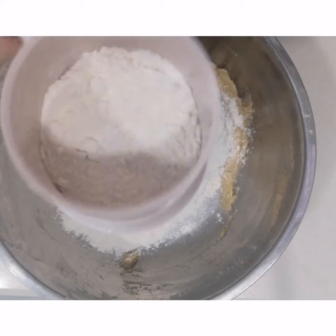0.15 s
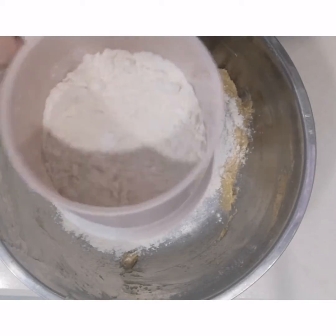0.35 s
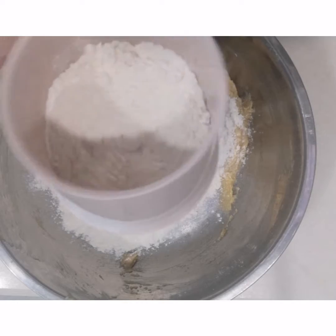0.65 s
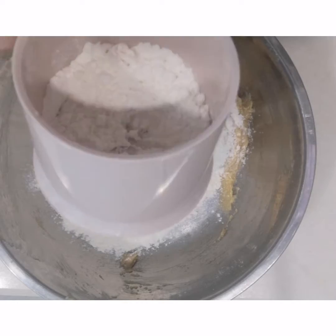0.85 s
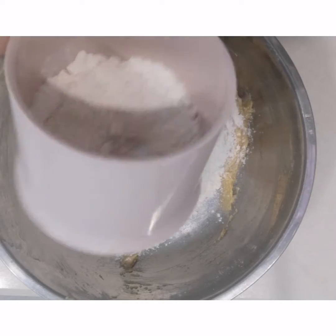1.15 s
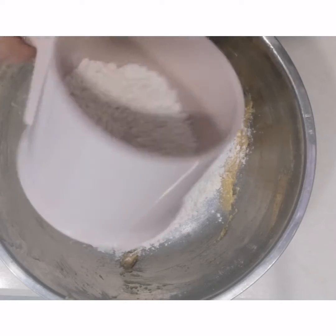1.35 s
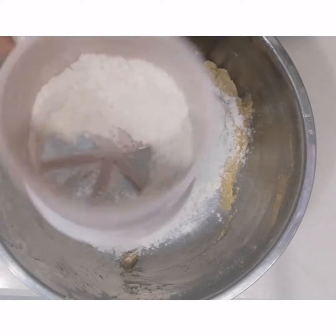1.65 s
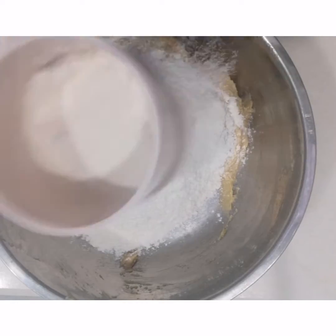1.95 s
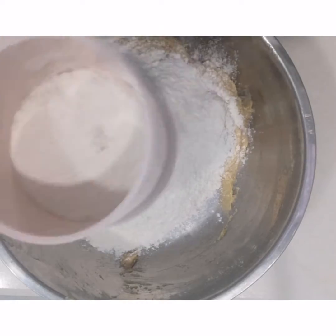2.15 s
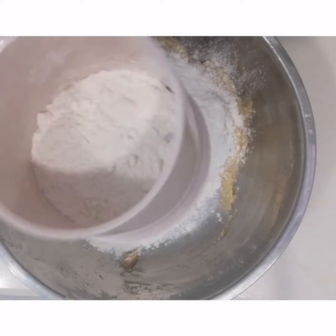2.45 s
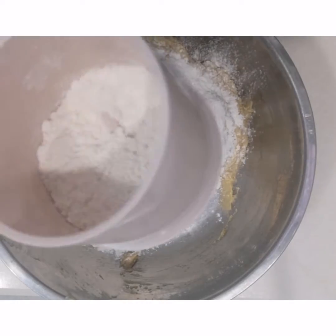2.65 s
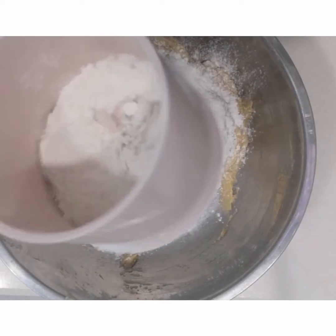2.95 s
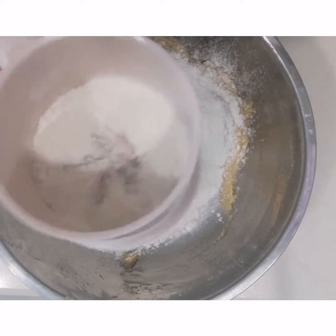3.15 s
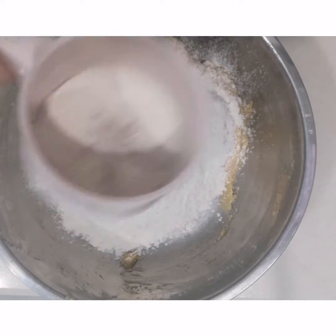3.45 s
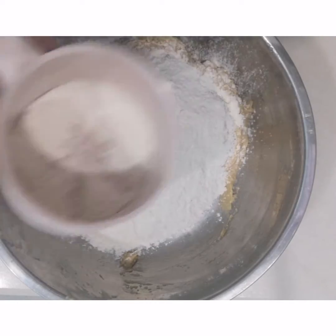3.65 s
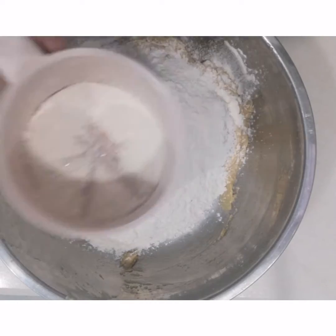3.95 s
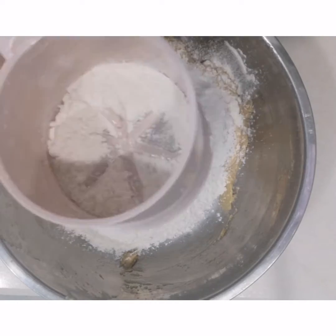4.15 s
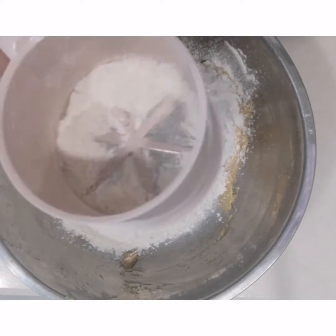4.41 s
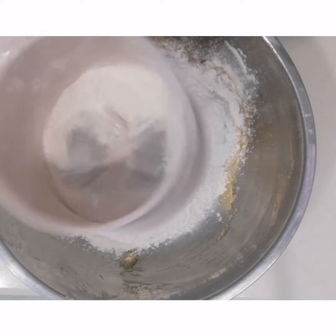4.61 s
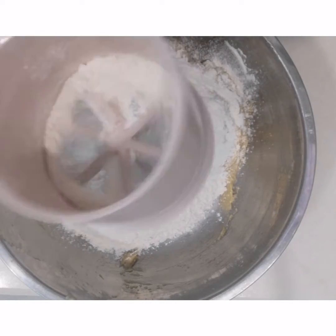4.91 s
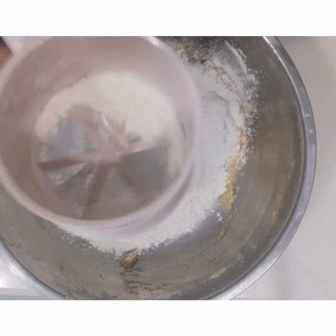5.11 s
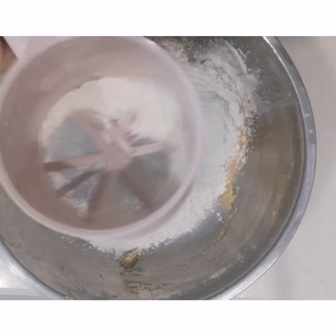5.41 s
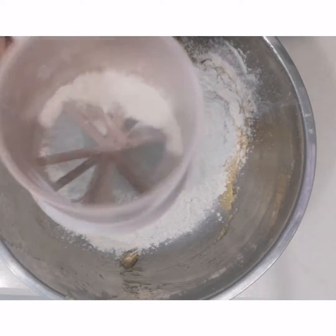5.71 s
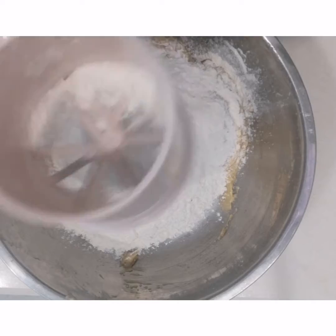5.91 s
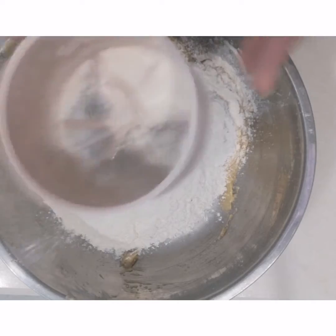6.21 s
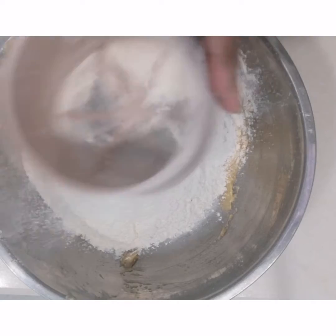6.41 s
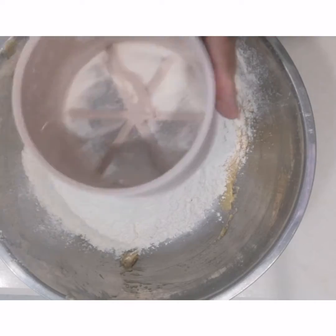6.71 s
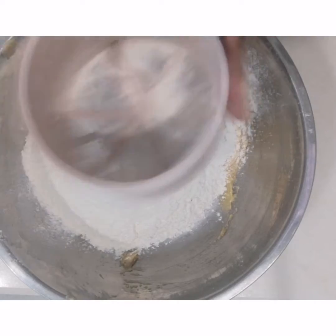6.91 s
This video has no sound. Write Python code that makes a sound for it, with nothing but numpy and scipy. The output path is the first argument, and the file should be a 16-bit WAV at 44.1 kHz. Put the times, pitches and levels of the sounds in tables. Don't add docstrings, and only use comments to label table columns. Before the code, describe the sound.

A plastic squeeze-handle flour sifter clacks in three brisk bursts, each squeeze a gritty mesh scrape ending in a sharp slap, over a low appliance hum.

```python
import sys
import numpy as np
from scipy import signal
from scipy.fft import rfft, irfft, next_fast_len
from scipy.io import wavfile
from scipy.ndimage import uniform_filter1d, map_coordinates

SR = 44100
rng = np.random.default_rng(int(sys.argv[2]) if len(sys.argv) > 2 else 0)


def makeup_ratio(level_db):
    decades = np.asarray(level_db, float) / 20
    return 10 ** decades


def bounce(signal):
    frames = np.transpose(np.atleast_2d(signal))
    limited = np.clip(frames, -1, 1)
    pcm = np.round(limited * 32767).astype(np.int16)
    wavfile.write(sys.argv[1], SR, pcm)


N = 311787
RIGHT_LATE = 26
FIRM_DB = -34


def unit(x):
    return x / np.sqrt(np.mean(x ** 2) + 1e-20)


def along(points, hz):
    f, v = np.transpose(points)
    return np.interp(np.log(hz + 1), np.log(f + 1), v)


def curves(rows):
    s, *cols = np.transpose(rows)
    return [np.interp(np.arange(N) / SR, s, c) for c in cols]


def wobble(rate):
    knots = rng.standard_normal(int(N * rate / SR) + 4)
    return map_coordinates(knots, [np.arange(N) * rate / SR])


def unit_gain(h):
    return h / np.sqrt(np.mean(abs(h) ** 2, axis=-1, keepdims=True))


def filtered(x, response):
    m = next_fast_len(N + SR // 2)
    h = unit_gain(response(np.fft.rfftfreq(m, 1 / SR)))
    return irfft(rfft(x, m) * h, m)[..., :N]


def modes(table, spread_db):
    share = makeup_ratio(spread_db * rng.standard_normal((len(table), 2, 1)))

    def response(f):
        total = 0
        for k, (c, w, db) in enumerate(table):
            ring = 1j * f * w / (c * c - f * f + 1j * f * w)
            total = total + (-1) ** k * share[k] * makeup_ratio(db) * ring
        return total
    return response


def grit(alike, spiky_db):
    size = makeup_ratio(spiky_db * rng.standard_normal((3, N)))
    shared, *own = rng.standard_normal((3, N)) * size
    common = np.array([shared, np.roll(shared, RIGHT_LATE)])
    pair = alike * common + np.sqrt(1 - alike ** 2) * np.array(own)
    return unit(pair * makeup_ratio(2.04 * wobble(300)))


def add(track, s, db, rise, fall):
    steps = np.arange(-SR // 20, SR // 6)
    t = steps / SR
    at = round(s * SR) + steps
    swell, fade = np.exp(np.minimum(t, 0) / rise), np.exp(-np.maximum(t, 0) / fall)
    shape = np.where(t < 0, swell, fade)
    keep = (at >= 0) & (at < N)
    track[at[keep]] += (makeup_ratio(db) * shape[keep]) ** 2


def knocks(times, db, rebound_db):
    force = np.zeros((2, N + SR))
    for s, peak_db, draw in zip(times, db, rng.random((len(times), 3, 5))):
        late = np.append(0, .0005 + .0045 * draw[0])
        rebounds = np.sign(draw[1] - .5) * makeup_ratio(rebound_db - 540 * late[1:])
        size = makeup_ratio(peak_db) * np.append(1, rebounds)
        at = np.round((s + late) * SR).astype(int)
        np.add.at(force[0], at, size)
        np.add.at(force[1], at + RIGHT_LATE, size * np.append(1, 3 * draw[2] - 1))
    return force[:, :N]


# time in seconds, hum level in dB.
HUM_LOAD = [(0, -48), (.3, -41), (.7, -39), (1.5, -39), (2.2, -45), (2.7, -37), (3.4, -38), (3.7, -43),
            (4.15, -35), (4.6, -39), (5.3, -40), (5.8, -37), (6.4, -42), (7.07, -41)]
# pitch in Hz, level in dB per Hz.
RUMBLE_COLOUR = [(20, -32), (30, -8), (40, -24), (58, -23), (91, -29.5), (137, -24), (172, -36.5),
                 (235, -31.5), (295, -45), (322, -38), (500, -60.5), (650, -80.5), (1100, -120)]


def appliance():
    shaft_hz, fan_shaft_hz, beat_peak_s = 25.91, 22.25, 3.45
    t = np.arange(N) / SR
    drift = .2 * np.array([wobble(2), wobble(3)])
    one, two = 2 * np.pi * np.outer([shaft_hz, fan_shaft_hz], t - beat_peak_s) + drift
    mixed = makeup_ratio(-14 + 2 * wobble(1.5)) * np.sin(two)
    mixed = mixed + makeup_ratio(-19) * np.sin(2 * one - two) + makeup_ratio(-20) * np.sin(one + two)
    load_db = uniform_filter1d(curves(HUM_LOAD)[0], size=SR // 10)
    hum = makeup_ratio(load_db + 3) * (np.sin(one) + mixed)
    fan = makeup_ratio(-65.5 + wobble(2.9)) * np.sin(2 * np.pi * 136 * t + .56 * wobble(2.1))
    mid, side = filtered(rng.standard_normal((2, N)), lambda f: makeup_ratio(along(RUMBLE_COLOUR, f)))
    side = unit(filtered(side, lambda f: f ** 2))
    handled = np.clip(sum(np.exp(-((t - s) / .3) ** 2) for s, *_ in SLAMS), 0, 1)
    handled = handled * (1 - .5 * curves(EMPTIED)[0])
    rumble = makeup_ratio(-58.5 + 8 * handled + 2.4 * wobble(8.9))
    return hum + fan + rumble * (mid + makeup_ratio(-12.5) * side * [[1], [-1]])


# pitch in Hz, level in dB per Hz.
AIR_COLOUR = [(250, -28), (450, -5.5), (650, -10), (950, -5.5), (1400, -8), (1950, -4.5), (2500, -9.5),
              (4100, -17), (6500, -21), (9500, -20), (10500, -26), (13000, -29), (15500, -29.5),
              (16000, -62.5)]


def room_air():
    noise = filtered(rng.standard_normal((2, N)), lambda f: makeup_ratio(along(AIR_COLOUR, f)))
    return makeup_ratio(-68 + .6 * wobble(4)) * noise


# time in seconds, level in dB, wall share in dB, swell in seconds, fade in seconds.
STRAY_SCUFFS = [
    (.022, -41, 4, .001, .017),
    (2.873, -43, -15, .001, .004),
    (3.428, -49, 6, .005, .017),
    (4.177, -36, -10, .001, .01),
    (6.071, -23, 5, .003, .03),
    (7.0577, -30.5, -30, .001, .006),
]


def stray_scuffs():
    return [(s, db, wall_db, -11, swell, fade) for s, db, wall_db, swell, fade in STRAY_SCUFFS]


# start in seconds, travel in seconds,
# break-away level in dB, sliding level in dB, level of landing at rest in dB.
SPRING_BACK = [(0.0351, .048, -38, -41, -44.5), (0.3363, .048, -33, -41.5, -44),
               (0.6407, .04, -33, -41, -41), (0.9463, .052, -33, -36.5, -44.5),
               (1.2436, .046, -29, -37.5, -46.5), (1.5573, .04, -30, -38, -38.5),
               (2.715, .047, -36.5, -34, -35.5), (3.0592, .042, -29.5, -39.5, -41.5),
               (4.1846, .046, -33, -38.5, -40), (4.4938, .04, -30.5, -40, -38.5),
               (4.7686, .048, -30, -38, -36.5), (5.048, .049, -29, -45, -36.5),
               (5.3323, .048, -24.5, -33, -45), (5.618, .045, -23, -37, -45),
               (5.89, .054, -24.5, -35.5, -39.5)]


def releases():
    rows = []
    for s, travel, break_db, slide_db, rest_db in SPRING_BACK:
        rows.append((s, break_db, -6, -8, .0055, .018))
        rows.append((s + .48 * travel, slide_db, 0, -13, .007, .017))
        rows.append((s + travel, rest_db, 2, -3, .003, .009))
    return rows


# start in seconds before the slam, starting level in dB, level of catching a rib in dB.
SQUEEZE_STROKES = [(.043, -44, -50), (.048, -47, -38), (.039, -48, -35.5), (.042, -46, -36.5),
                   (.046, -43, -37.5), (.036, -36.5, -35.5), (.036, -39, -40), (.04, -36, -36.5),
                   (.048, -43, -34), (.041, -43, -33), (.046, -47, -29), (.041, -41, -33.5),
                   (.045, -39.5, -31), (.041, -48.5, -28), (.041, -50, -29.5)]


def squeezes():
    rows = []
    for (slam, *_), (lead, start_db, catch_db) in zip(SLAMS, SQUEEZE_STROKES):
        rows.append((slam - lead, start_db, -3, -8, .004, .015))
        rows.append((slam - .025, catch_db, -4, -7, .0055, .015))
    return rows


def scrape(mesh, wall, cup):
    for s, db, wall_db, cup_db, swell, fade in squeezes() + releases() + stray_scuffs():
        wall_luck, cup_luck = 2 * rng.standard_normal(2)
        firmer_db = db - FIRM_DB
        cup_db = cup_db - .55 * firmer_db
        fade = fade * .5 ** (max(firmer_db, 0) / 11)
        add(mesh, s, db + 1, swell, fade)
        add(wall, s, db + wall_db + wall_luck - 4.5, swell, fade)
        add(cup, s, db + cup_db + cup_luck + 4.5, swell, fade * 1.69)


def handle_rests():
    s, travel, _, _, rest_db = np.transpose(SPRING_BACK)
    blows = knocks(s + travel, rest_db + 28, rebound_db=-11)
    thumps = knocks(s + travel, -31 + .3 * (rest_db - FIRM_DB), rebound_db=-11)
    return blows, thumps


# time in seconds, peak level in dB, jolt of the mesh in dB, thump of the base in dB.
SLAMS = [(0.2366, -7.5, -20.5, -29), (0.5285, -8.5, -18.5, -30), (0.8273, -9, -16, -32),
         (1.134, -7.5, -15.5, -30.5), (1.4354, -7.5, -14.5, -33.5), (1.7485, -7.5, -14.5, -32),
         (2.9311, -8.5, -13, -39), (3.248, -9.5, -14, -42), (4.3777, -8, -12.5, -39),
         (4.6704, -6.5, -15.5, -46), (4.9557, -7, -13.5, -39), (5.2271, -6, -12, -47),
         (5.511, -6.5, -12.5, -42.5), (5.7963, -7, -11, -43), (6.0764, -14, -7, -44)]


def handle_slams(mesh, wall):
    run_up_s = .009
    for s, db, jolt_db, _ in SLAMS:
        add(mesh, s, db + jolt_db + 1.5, run_up_s, .003)
        add(wall, s, db - 20, run_up_s * .5, .005)
    s, db, _, thump_db = np.transpose(SLAMS)
    blows = knocks(s - .0004, db + 13, rebound_db=-8)
    thumps = knocks(s, db + thump_db + 20, rebound_db=-11)
    return blows, thumps


# pitch in Hz, level in dB per Hz.
MESH_COLOUR = [(700, -43), (1300, -9.5), (2000, -3.5), (3500, -4), (4100, -5), (5150, -2.5), (6900, -6.5),
               (8100, -3.5), (9600, -6.5), (10400, -15), (12500, -19.5), (15000, -17.5), (15400, -48),
               (16000, -94)]


def mesh_hiss(power):
    hiss = np.sqrt(power) * grit(.3, spiky_db=3)
    return filtered(hiss, lambda f: makeup_ratio(along(MESH_COLOUR, f)) * (f < 15300))


# pitch in Hz, width in Hz, level in dB.
WALL_NOTES = [(1143, 110, 0.5), (1380, 250, -11), (1630, 170, 1.5), (1860, 150, -10), (2170, 220, -1),
              (2573, 260, -3.5), (3040, 260, -2.5), (3350, 450, -7), (3834, 850, -17), (2140, 2480, -9.5)]


def plastic_wall(power, blows):
    blows = uniform_filter1d(blows, size=3, axis=1)
    force = np.sqrt(power) * grit(.59, spiky_db=2.5) + .8 * blows
    grip = np.pi / 4 * (1 + np.tanh(wobble(4)))
    one_grip = filtered(force * np.cos(grip), modes(WALL_NOTES, 2.1))
    other_grip = filtered(force * np.sin(grip), modes(WALL_NOTES, 2.1))
    return one_grip + other_grip


# pitch in Hz, width in Hz, level in dB.
FULL_CUP_NOTES = [(411.5, 70, -16), (560, 300, -18.5), (770, 140, -8), (904.6, 95, -0.5), (995, 96, -1),
                  (1440, 120, -17)]
# pitch in Hz, width in Hz, level in dB.
BARE_CUP_NOTES = [(418, 98, -20.5), (560, 300, -28), (895, 150, -8.5), (1052, 120, 3), (1250, 280, -10.5),
                  (1390, 200, -12)]
# time in seconds, share of the
EMPTIED = [(0, 0.15), (3.5, 0.18), (4.5, 0.45), (5.2, 0.92), (7.07, 0.7)]


def cup_air(power):
    rasp = np.sqrt(power) * grit(.45, spiky_db=3.5)
    gone = curves(EMPTIED)[0]
    full = filtered(rasp * np.sqrt(1 - gone), modes(FULL_CUP_NOTES, 1))
    bare = filtered(rasp * np.sqrt(gone), modes(BARE_CUP_NOTES, 1))
    return full + makeup_ratio(-3) * bare


# pitch in Hz, width in Hz, level in dB.
BASE_NOTES = [(80, 60, -8), (200, 80, -16.5), (284, 70, -0.5), (410, 90, -3.5), (530, 160, -7)]


def base(thumps):
    return filtered(thumps, modes(BASE_NOTES, 1))


# pitch in Hz, time to fall by 60 dB in seconds.
KITCHEN_FADE = [(300, 0.39), (1000, 0.72), (2500, 0.8), (4000, 0.66), (7000, 0.57), (12000, 0.39)]


def kitchen(x, early_db, count):
    last_echo_s, drop_db = .175, -8
    wet = np.zeros((2, N + SR))
    step = N // count + 1
    for at in range(0, N, step):
        hz, t, z = signal.stft(rng.standard_normal((2, SR // 2)), SR, nperseg=256)
        late_db = -60 * t / along(KITCHEN_FADE, hz)[:, None]
        late_db = late_db + drop_db * np.clip((t - last_echo_s) / .06, 0, 1)
        near_walls = makeup_ratio(early_db - 60 * t / .12)
        tail = signal.istft(z * (makeup_ratio(late_db) + near_walls), SR, nperseg=256)[1]
        tail = tail / np.linalg.norm(tail[0])
        answer = signal.fftconvolve(x[:, at:at + step], tail, axes=1)
        wet[:, at + 200:at + 200 + answer.shape[1]] += answer
    return wet[:, :N]


# time in seconds, level in dB.
RUSTLES = [
    [(2.3, -84), (2.536, -77), (2.7, -71)],
    [(3.9, -79), (4.0, -79), (4.165, -75)],
    [(6.3, -70), (6.838, -73.5), (7.045, -78)],
]


def rustle():
    rows = []
    for part in RUSTLES:
        rows += [(part[0][0] - .02, -100), *part, (part[-1][0] + .005, -100)]
    rub = grit(.2, spiky_db=4.5) * makeup_ratio(2.3 * wobble(60))
    rub = filtered(rub, lambda f: makeup_ratio(along(MESH_COLOUR, f)))
    return makeup_ratio(curves(rows)[0] + 2.5) * unit(rub)


# time in seconds, peak level in dB.
CRUMBS = [(2.5182, -54), (6.3967, -57), (6.434, -60), (6.4844, -60), (6.5184, -57), (6.5425, -58),
          (6.5694, -59), (6.5804, -57), (6.653, -55), (6.6618, -54), (6.6784, -49), (6.7314, -55),
          (6.7674, -64), (6.867, -51.5), (7.0254, -59)]


def crumbs(mesh):
    for s, db in CRUMBS:
        add(mesh, s + .0015, db - 5, .0012, .007)


# time in seconds, peak level in dB, brightness in dB.
FINGER_TICKS = [
    (2.591, -33, -36),
    (2.6357, -39, -26),
    (3.5352, -40, 6),
    (4.051, -49, -14),
]
# pitch in Hz, width in Hz, level in dB.
RIM_NOTES = [(1120, 120, -4), (1630, 110, -6), (1830, 250, -14)]


def finger_ticks(mesh):
    rim = np.zeros(N)
    for s, db, bright_db in FINGER_TICKS:
        add(rim, s, db - 9.5, .0008, .006)
        add(mesh, s, db + bright_db - 13, .0005, .004)
    return filtered(np.sqrt(rim) * grit(.99, spiky_db=-1), modes(RIM_NOTES, 1.2))


def sifter():
    mesh, wall, cup = np.zeros((3, N))
    scrape(mesh, wall, cup)
    rest_blows, rest_thumps = handle_rests()
    slam_blows, slam_thumps = handle_slams(mesh, wall)
    crumbs(mesh)
    ticks = finger_ticks(mesh)
    taps = ticks + base(slam_thumps + rest_thumps)
    return mesh_hiss(mesh), plastic_wall(wall, slam_blows + rest_blows), cup_air(cup), taps


def scene():
    hiss, wall, hollow, taps = sifter()
    near = (hiss + wall + hollow + taps) * makeup_ratio([[.6], [-.6]])
    to_room = makeup_ratio(-8) * hiss + makeup_ratio(-4) * wall + makeup_ratio(-4) * hollow + makeup_ratio(-6) * taps
    echo = kitchen(to_room, early_db=-4, count=18)
    return near + echo + appliance() + room_air() + rustle()


def top_cut(x):
    return signal.sosfilt(signal.butter(12, 16390, fs=SR, output="sos"), x)


def record(dry):
    m = next_fast_len(N + SR // 2)
    in_band = np.fft.rfftfreq(m, 1 / SR) < 15750
    kept = irfft(rfft(dry, m) * in_band, m)[:, :N]
    return top_cut(kept)


dry = scene()
out = record(dry)
bounce(out)
```